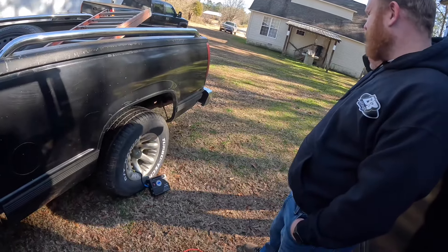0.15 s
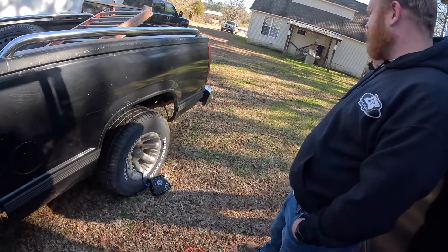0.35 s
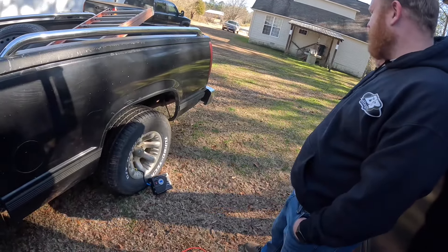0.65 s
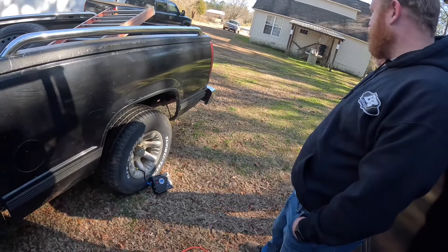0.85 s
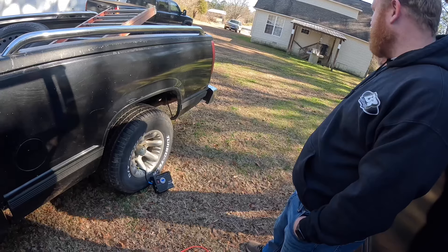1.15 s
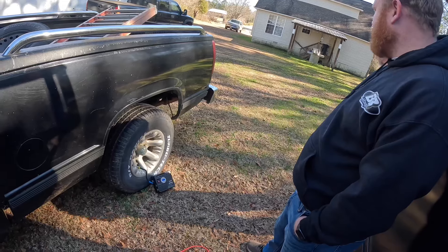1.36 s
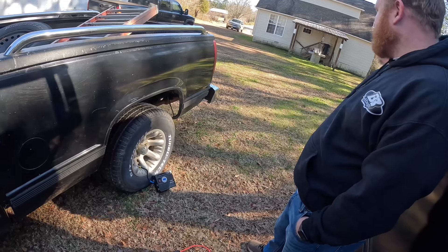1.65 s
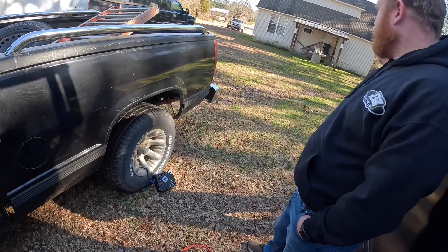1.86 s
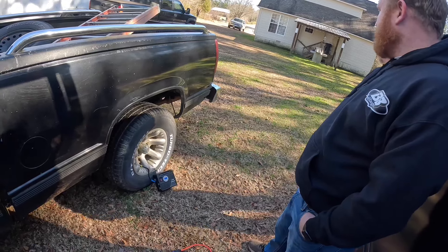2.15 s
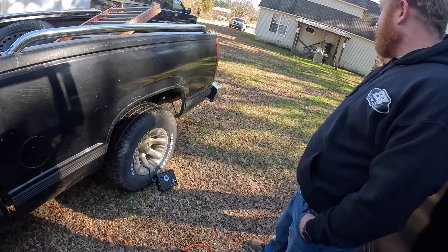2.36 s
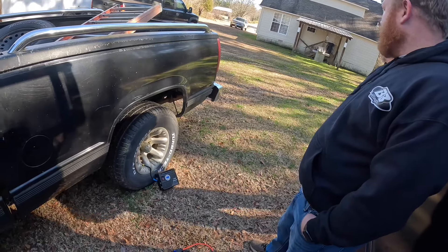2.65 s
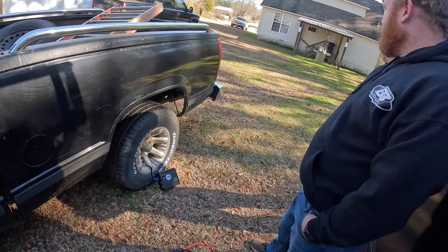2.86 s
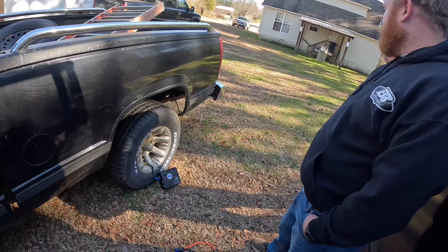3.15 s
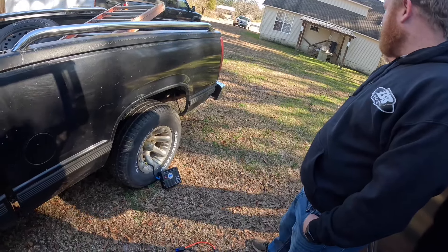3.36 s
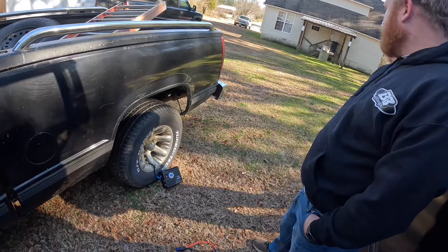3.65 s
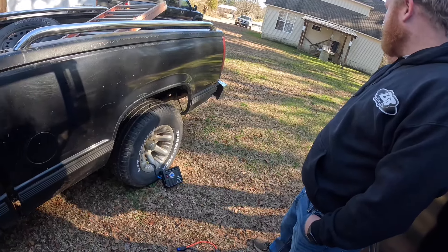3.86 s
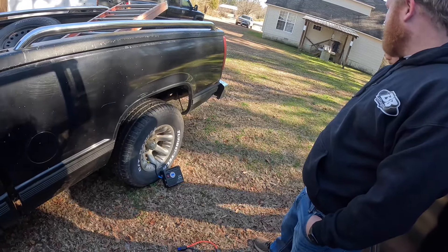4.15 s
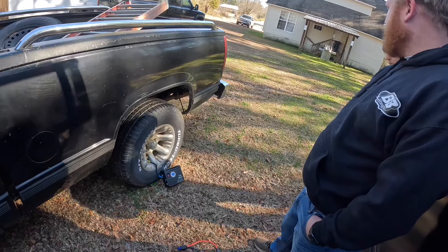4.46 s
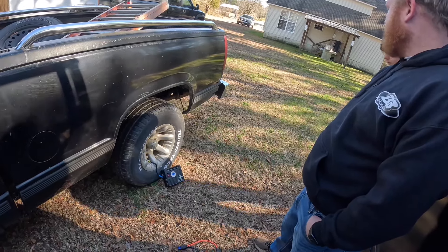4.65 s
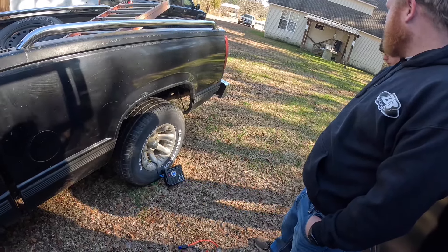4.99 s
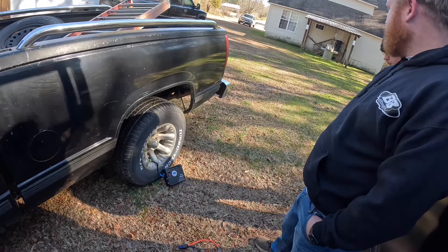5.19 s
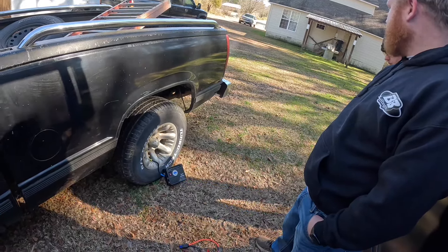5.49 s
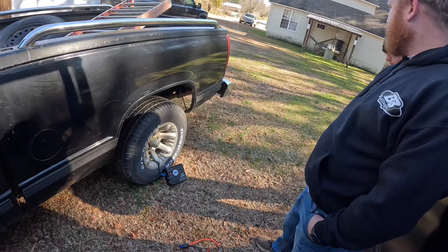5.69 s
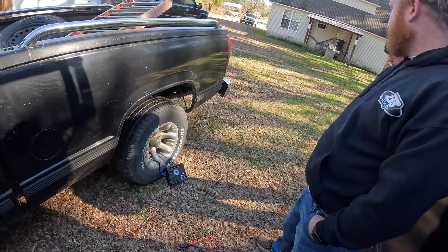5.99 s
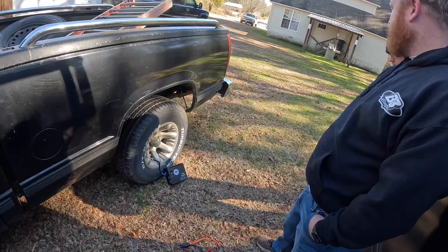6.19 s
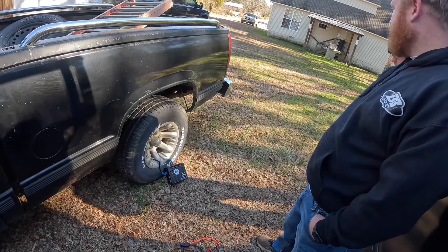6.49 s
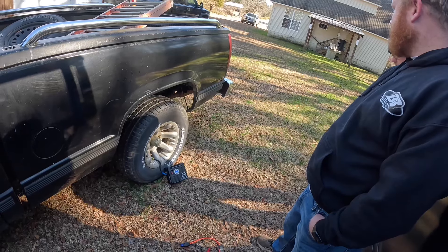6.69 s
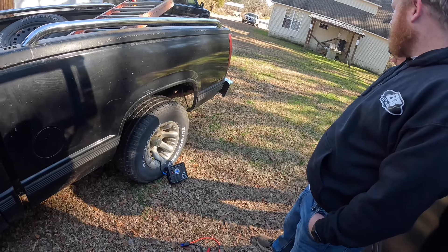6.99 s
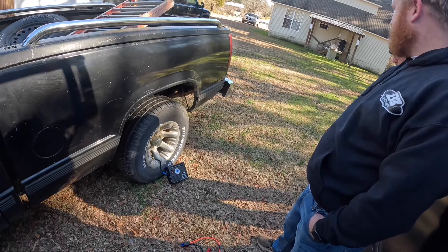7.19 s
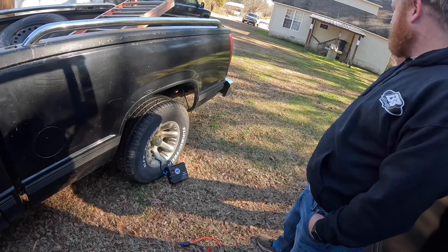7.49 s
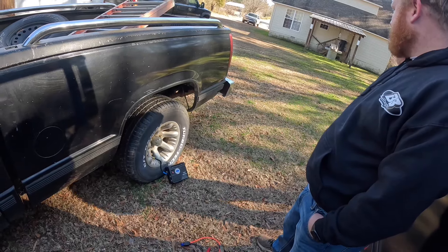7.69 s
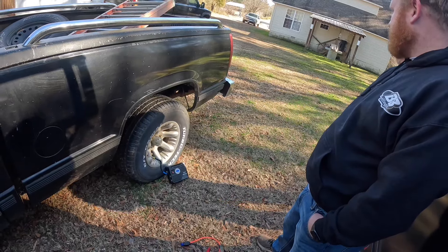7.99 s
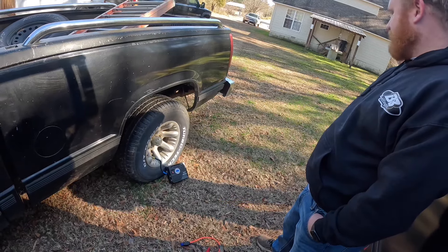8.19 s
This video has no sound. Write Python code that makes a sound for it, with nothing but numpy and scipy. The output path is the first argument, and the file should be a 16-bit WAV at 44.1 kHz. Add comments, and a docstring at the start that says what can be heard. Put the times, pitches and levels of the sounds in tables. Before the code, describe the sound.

A small air compressor hammers out a fast, steady buzzing rattle with hiss and whistle while a pickup engine idles in a low drone outdoors.

```python
"""A small geared piston compressor pumps on the grass beside a pickup whose eight-cylinder engine idles.
The pump knocks twice a turn, its gear sings under load, the motor shaft beats against the crank, and air
hisses and whistles through the valves: tones and shaped noise that all follow one crank angle.
The exhaust drones on multiples of the engine cycle over a low rumble.
Two microphone ports hear nearly the same, with a small lag and one later echo between them."""
import sys
import numpy as np
from scipy import signal
from scipy.fft import rfft, irfft, next_fast_len
from scipy.io import wavfile
from scipy.ndimage import map_coordinates

SR = 44100
rng = np.random.default_rng(int(sys.argv[2]) if len(sys.argv) > 2 else 0)


def to_wav(s):
    """Save 16-bit WAV."""
    ch = np.atleast_2d(s).T  # columns
    pcm = np.round(np.clip(ch, -1, 1) * 32767)  # PCM
    wavfile.write(sys.argv[1], SR, pcm.astype(np.int16))


N = 367661

WHEEL_TEETH, PINION_TEETH = 53, 11
SHAFT_RATIO = WHEEL_TEETH / PINION_TEETH  # motor shaft turns per crank turn
NEAREST_RATIO = 5  # the whole number of shaft turns it beats against


def undb(db):
    """Gain of a level in dB."""
    return 10 ** (np.asarray(db) / 20)


def level(x, db):
    """Scale to an rms level in dB."""
    return x * undb(db) / np.sqrt(np.mean(x ** 2))


def curve(table):
    """Columns of a time table, one value a sample."""
    s, *columns = np.transpose(table)
    return [np.interp(np.arange(N) / SR, s, c) for c in columns]


def colour(x, points, rings=(), phase=0.):
    """Filter by (f/Hz, level/dB) points and (f/Hz, width/Hz, level/dB) bells; phase in radians at the points."""
    size = next_fast_len(N)
    hz = np.arange(size // 2 + 1) * SR / size + 1e-3
    at, point_db = np.transpose(points)
    db = np.interp(np.log(hz), np.log(at), point_db)
    for f, width, ring_db in rings:
        db = db + ring_db / (1 + (2 * (hz - f) / width) ** 2)
    turn = np.exp(1j * np.interp(hz, at, phase + 0 * at))
    return irfft(rfft(x, size) * undb(db) * turn, size)[:N]


def walk(rate):
    """Smooth random wander around 0 through standard normal knots, `rate` of them a second."""
    knots = rng.standard_normal(int(N / SR * 200) + 4)
    coarse = np.arange(0, N + 64, 64)
    wander = map_coordinates(knots, [coarse / SR * rate], order=3)
    return np.interp(np.arange(N), coarse, wander)


def hump(turns, at, width):
    """A bell once a turn, peak 1; place and width in shares of a turn."""
    return np.exp((np.cos(2 * np.pi * (turns - at)) - 1) / (2 * np.pi * width) ** 2)


# the idle hunts a little: (t/s, firing rate f/Hz)
IDLE_FIRINGS = [(0.0, 55.7), (0.74, 55.1), (0.93, 55.35), (1.92, 55.14), (2.92, 55.4), (3.56, 55.27),
                (3.8, 55.42), (4.99, 54.89), (5.18, 54.88), (5.97, 55.88), (6.77, 54.44), (7.51, 56.3),
                (7.8, 55.15), (8.34, 55.46)]
# exhaust tones: (multiple of the full engine cycle, relative level/dB)
EXHAUST_ORDERS = [(1, -34.0), (2, -35.4), (3, -24), (4, -30), (5, -18.2), (6, -14), (7, -25), (8, 0.5),
                  (9, -42), (10, -39), (11, -3), (12, -9.5), (13, -9.5), (14, -12.5), (15, -39), (16, -19),
                  (17, -42), (18, -15), (19, -38), (20, -21.5), (21, -14.5), (22, -41), (23, -15),
                  (24, -13), (25, -7.5), (26, -23), (27, -11.5), (28, -17), (29, -11), (30, -20.5),
                  (31, -20.6), (32, -25), (33, -27.1), (34, -14.5), (35, -18), (36, -25), (37, -24.5),
                  (38, -29), (39, -21), (40, -33.5), (41, -30), (42, -46), (43, -37), (44, -24.5)]
# shape of the low exhaust noise: (f/Hz, relative level/dB per Hz)
RUMBLE_SHAPE = [(20, -40), (35, -11), (60, 9), (100, -20), (125, 2), (180, 7.5), (250, 5.5), (330, -32),
                (600, -50), (2000, -110)]
# in firing order: (strength level/dB, lateness through its own manifold branch t/ms)
CYLINDERS_FIRING = [(-1.8, -0.46), (-7.6, 0.67), (2.5, -1.68), (1.2, 1.38), (-1.0, -2.68), (6.0, 0.94),
                    (-1.8, 1.41), (2.5, 0.42)]
FIRST_CYCLE = .1486  # share of a cycle gone at the start
PIPE_TURN, PIPE_SPREAD = 1.75, .0088  # radians; radians per multiple squared


def engine(db=-17.5, waver=0.17, waver_rate=5.0, rumble_db=-16, throb=0.26):
    """Pickup exhaust: tones set in step by the firing pattern, each wavering with uneven burns, over rumble."""
    cycle_hz = curve(IDLE_FIRINGS)[0] / len(CYLINDERS_FIRING)
    cycle = FIRST_CYCLE + np.cumsum(cycle_hz) / SR
    strength_db, late_ms = np.transpose(CYLINDERS_FIRING)
    even_moment = np.arange(len(CYLINDERS_FIRING)) / len(CYLINDERS_FIRING)
    moment = even_moment + late_ms / 1000 * cycle_hz.mean()  # share of a cycle
    tones = 0
    for k, order_db in EXHAUST_ORDERS:
        firing_sum = undb(strength_db) @ np.exp(-2j * np.pi * k * moment)
        # the pipe lets higher tones out a little later
        start = np.angle(firing_sum) + PIPE_TURN - PIPE_SPREAD * k ** 2
        wobble = 1 + waver * (walk(waver_rate) + 1j * walk(waver_rate))
        tone = (wobble * np.exp(1j * (2 * np.pi * k * cycle + start))).real
        tones = tones + undb(order_db) * tone
    # the rumble swells once a cycle
    swell = 1 + throb * hump(cycle, 0.39, width=0.047)
    rumble = colour(swell * rng.standard_normal(N), RUMBLE_SHAPE)
    return undb(db) * (level(tones, 0) + level(rumble, rumble_db))


def beat(turns):
    """Angle in radians by which the motor shaft slips against the crank."""
    return 2 * np.pi * (NEAREST_RATIO - SHAFT_RATIO) * turns


# how the housing answers the knocks: (multiple of the crank turn, relative level/dB)
HOUSING_ORDERS = [(7, -41.5), (8, -33.5), (9, -32.5), (10, -37.0), (11, -40.0), (12, -43.0), (13, -36.5),
                  (14, -52.5), (15, -51.0), (16, -72.5), (17, -50.0), (18, -42.0), (19, -44.0), (20, -48.0),
                  (21, -56.5), (22, -56.5), (23, -55.0), (25, -60.5), (27, -52.5), (29, -58.5), (30, -63.0),
                  (31, -57.0), (33, -50.5), (34, -64.0), (36, -50.5), (37, -63.5), (47, -50.5), (48, -54)]
# moments of the outlet valve knock and the piston reversal knock: (share of a turn, share of a turn)
KNOCK_MOMENTS = (.7937, 0.0347)
KNOCK_SPREAD, HOUSING_TURN = .0074, .92  # radians per multiple squared; radians


def knocks(turns, outlet_share=0.85, waver=0.03, runout=0.01, shift_turns=0.0008):
    """Valve and piston reversal knock every turn; an off-centre pinion sways their strength and moment."""
    swayed = turns + shift_turns * np.sin(beat(turns))
    tones = 0
    for k, db in HOUSING_ORDERS:
        # two blows a turn set the step of each tone; lower tones ring out later
        outlet, reversal = (np.exp(-2j * np.pi * k * at) for at in KNOCK_MOMENTS)
        start = np.angle(outlet_share * outlet + reversal) + KNOCK_SPREAD * k ** 2 + HOUSING_TURN
        tone = np.cos(2 * np.pi * k * swayed + start)
        tones = tones + undb(db) * (1 + waver * walk(11.0)) * tone
    return tones * (1 + runout * np.cos(beat(turns)))


# shape of motor ticks, air and rattle: (f/Hz, relative level/dB per Hz)
AIR_SHAPE = [(200, -24.5), (300, -1), (450, -2.5), (600, -8), (760, -6.5), (850, -11.5), (1300, -10),
             (2100, -15.5), (2800, -28), (3750, -21.5), (5200, -22), (5600, -22), (9800, -30),
             (11000, -38.5), (14600, -47)]
# resonances and dips in that shape: (f/Hz, width f/Hz, level/dB)
AIR_RINGS = [(690.4, 57, 7), (1500, 94, 3.5), (1586, 34, -8), (2555, 250, 14), (5250, 59, -13),
             (4530, 55, -6), (1334, 65, -7.5), (3050, 52, 13.5), (3630, 140, -22), (3740, 120, 10),
             (4400, 130, 4.5), (5990, 190, -3.5), (4560, 32, 10), (4800, 160, 6.5), (5190, 160, 8),
             (6620, 270, 1.5), (7520, 250, 5), (8690, 220, 5.5), (9660, 230, 6.5), (9920, 140, -12),
             (10150, 230, 8)]


def motor(turns):
    """Shaft-rate ticks of the motor, harder on the compression stroke."""
    ticks = hump(turns * SHAFT_RATIO, 0, width=0.029)
    load = 0.72 + hump(turns, 0.39, width=0.33)
    return colour(ticks * load, AIR_SHAPE, AIR_RINGS)


def gear(turns):
    """Tooth mesh swells on the compression stroke while the crank's uneven pace bends its pitch."""
    load = 0.082 + hump(turns, 0.5, width=0.11)
    # sway of the mesh angle in radians: once and twice a turn, and at random
    slowing = 1.26 * np.sin(2 * np.pi * (turns - .05)) + 0.69 * np.sin(4 * np.pi * (turns - .2))
    slowing = slowing + 0.21 * walk(40.)
    mesh = 2 * np.pi * WHEEL_TEETH * turns + slowing
    song = np.cos(mesh) + undb(-22.5) * np.cos(2 * mesh)
    return load * undb(0.87 * walk(30.)) * song


def blows(turns, at, scatter_db, runout):
    """One click a turn, shared between two samples; an off-centre pinion sways its strength."""
    out = np.zeros(N + 1)
    count = np.arange(1, int(turns[-1] - at) - 1)
    place = np.interp(count + at, turns, np.arange(N))
    scatter = undb(scatter_db * rng.standard_normal(len(count)))
    size = scatter * (1 + runout * np.cos(beat(count)))
    i = place.astype(int)
    out[i] += size * (i + 1 - place)
    out[i + 1] += size * (place - i)
    return out[:N]


def grit(turns, repeating, wobble_turns=0.0053, size=400, count=4):
    """Noise whose treble is partly wheel wear, back every crank turn but read unevenly by the pinion."""
    shaft = 2 * np.pi * turns * SHAFT_RATIO
    uneven = 0
    for h in range(1, count + 1):
        uneven = uneven + wobble_turns * np.cos(h * shaft + 2 * np.pi * rng.random()) / h
    marks = rng.standard_normal(size)  # wear marks round the wheel
    wheel = np.interp((turns + uneven) * size, np.arange(size), marks, period=size)
    # scaled by the root of marks passing per sample
    wear = level(wheel, 0) * np.sqrt(size * turns[-1] / N)
    fresh = rng.standard_normal(N)
    # the fine wear marks take their share only above 1300 Hz
    fine = signal.butter(3, 1300, "high", fs=SR, output="sos")
    exchange = np.sqrt(repeating) * wear + (np.sqrt(1 - repeating) - 1) * fresh
    return fresh + signal.sosfiltfilt(fine, exchange)


# the narrow whistle band: (f/Hz, relative level/dB)
WHISTLE_BAND = [(1000, -82), (2200, -15), (2900, -5.5), (3180, 1.5), (3270, 5.5), (3380, 1), (3600, -13),
                (4200, -17), (6000, -90)]


def whistle(turns):
    """A narrow rough whistle, choked once a turn, that throbs with the shaft beat."""
    slip = beat(turns)
    throb_db = 2.2 * np.cos(slip) + 1.3 * np.cos(2 * slip + .8) + 1.6 * np.cos(3 * slip + 2.1)
    choke = 1.05 - 0.41 * hump(turns, 0.36, width=0.15)
    flow = choke * undb(throb_db + 0.86 * walk(6.))
    # two valve taps each turn ring the same band in step with the crank
    taps = sum(blows(turns, at, scatter_db=2.0, runout=0.043) for at in (.24, .8))
    return colour(flow * grit(turns, repeating=0.29) + 7 * taps, WHISTLE_BAND)


def air(turns):
    """Hiss that swells as the air is pushed out, with small rattles at the valve events."""
    flow = 0.48 + 0.66 * hump(turns, 0.82, width=0.18)
    flow = flow * (1 + 0.017 * np.cos(2 * np.pi * turns * SHAFT_RATIO))
    puffs = sum(blows(turns, at, scatter_db=4.5, runout=0.37) for at in (.95, .06))
    # each puff dies away with a 0.25 ms time constant
    rattle = signal.lfilter([1], [1, -np.exp(-1 / (0.00025 * SR))], puffs)
    strength = (flow + 0.25 * rattle) * undb(0.38 * walk(25.))
    return colour(strength * grit(turns, repeating=0.51), AIR_SHAPE, AIR_RINGS)


# pace of the pump: (t/s, crank turn rate f/Hz)
CRANK_PACE = [(0.0, 49.39), (1.72, 49.51), (3.39, 49.32), (5.6, 49.42), (6.47, 49.34), (8.34, 49.38)]


def compressor(db=-25.5):
    """Pump on the grass: all its parts follow one crank."""
    turns = np.cumsum(curve(CRANK_PACE)[0]) / SR
    # (part, level/dB within the pump)
    parts = [(knocks, -3.2), (motor, -17), (gear, -11), (whistle, -11), (air, -5)]
    return undb(db) * sum(level(part(turns), part_db) for part, part_db in parts)


# half-difference of the two microphone ports against their middle: (f/Hz, steady level/dB, delayed echo
# level/dB)
PORT_DIFFERENCE = [(60, -60, -64), (196, -68, -56), (370, -23, -44), (805, -48, -11), (1780, -32.5, -19),
                   (2500, -9.5, -29), (3500, -10.5, -9), (4030, -13, -5), (4440, -52, -56),
                   (6000, -53, -61), (6700, -37, -32), (9250, -45, -38), (9870, -12, -10), (11000, -5, -2),
                   (12300, -14, -3), (14300, -18, -2)]


def scene():
    """The two ports hear nearly the same; a small lag and one later, filtered echo set them apart."""
    mid = engine() + compressor()
    hz, steady_db, echo_db = np.transpose(PORT_DIFFERENCE)
    # a lag (near quarter-cycle difference) below 5 kHz, a louder left port above
    phase = np.where(hz < 5000, -1.4, .1)
    steady = colour(mid, np.c_[hz, steady_db], phase=phase)
    late = np.roll(mid, int(.031 * SR))  # 31 ms later; the end wraps to the start
    side = steady + colour(late, np.c_[hz, echo_db])
    return np.array([mid + side, mid - side])


def record(dry):
    """The camera behind the ports cuts the top steeply above 14.5 kHz."""
    top_cut = signal.ellip(12, .2, 60, 14500, fs=SR, output="sos")
    return signal.sosfilt(top_cut, dry)


dry = scene()
out = record(dry)
to_wav(out)
```